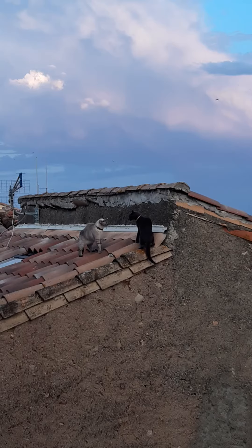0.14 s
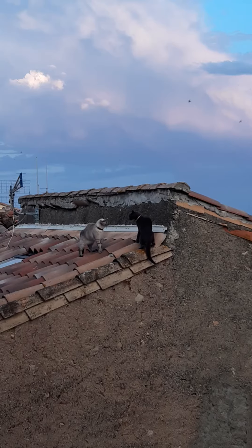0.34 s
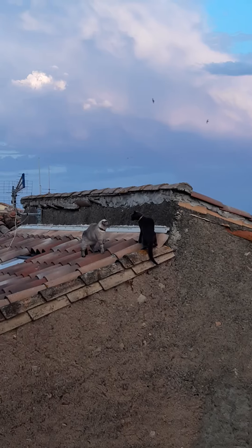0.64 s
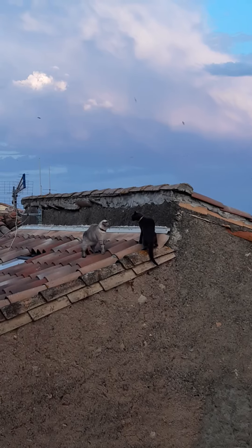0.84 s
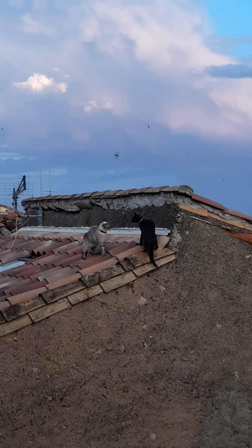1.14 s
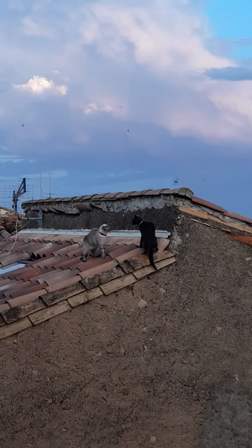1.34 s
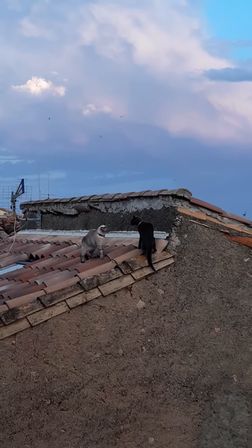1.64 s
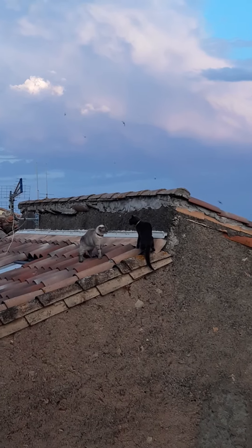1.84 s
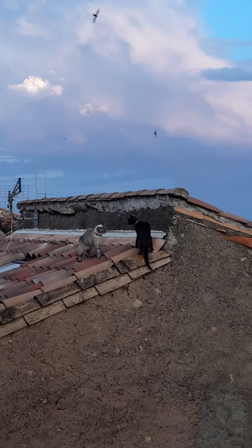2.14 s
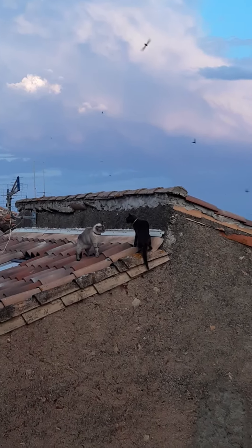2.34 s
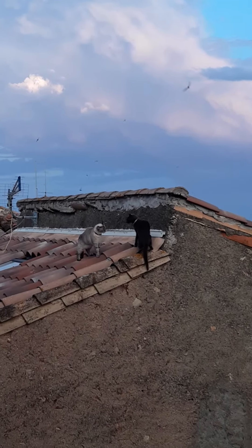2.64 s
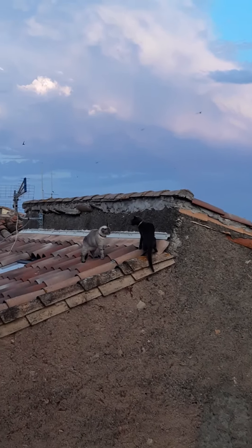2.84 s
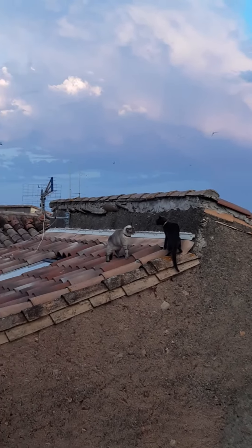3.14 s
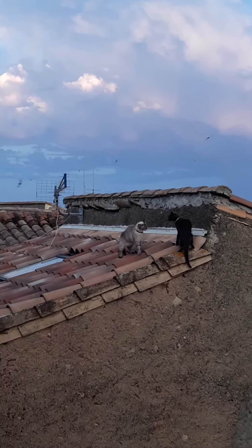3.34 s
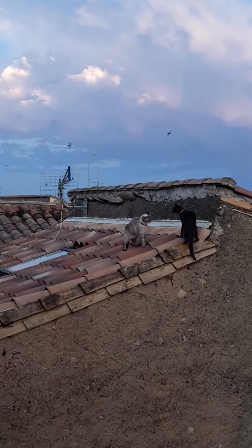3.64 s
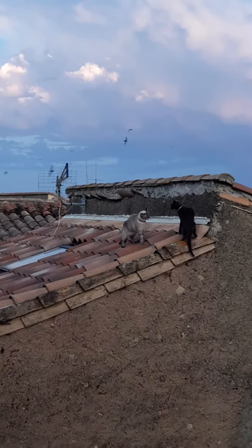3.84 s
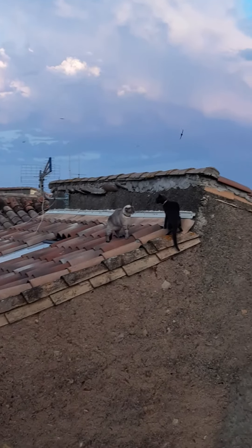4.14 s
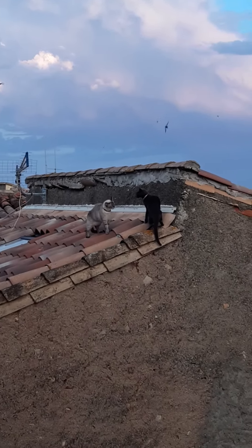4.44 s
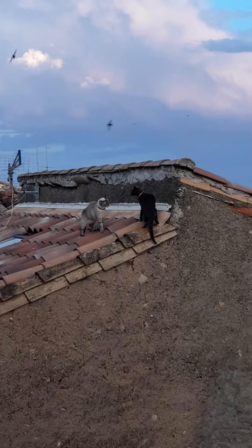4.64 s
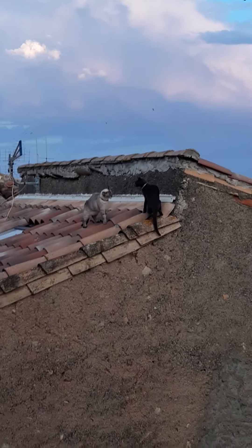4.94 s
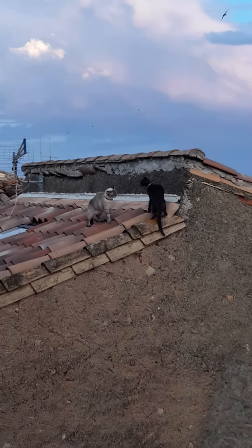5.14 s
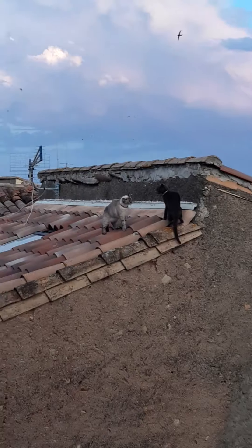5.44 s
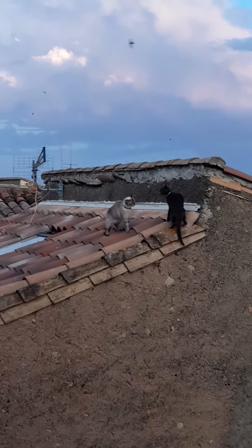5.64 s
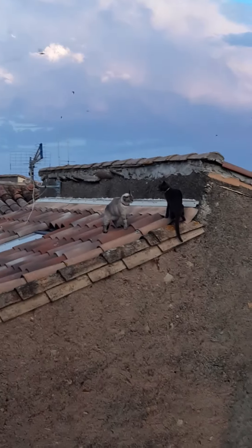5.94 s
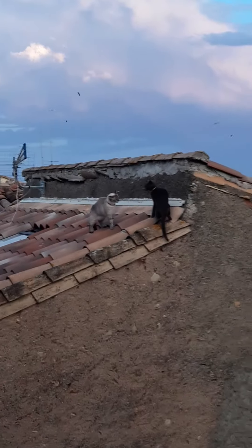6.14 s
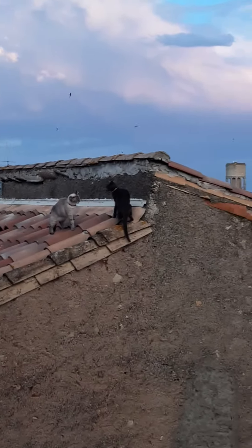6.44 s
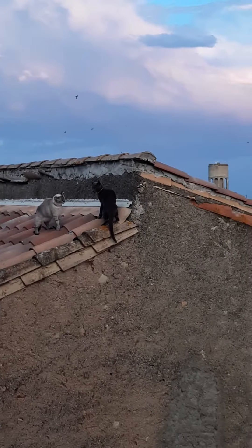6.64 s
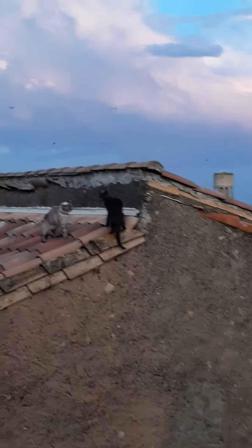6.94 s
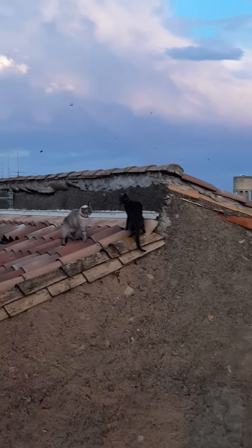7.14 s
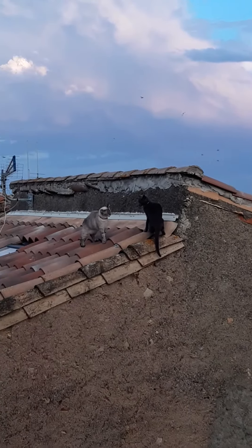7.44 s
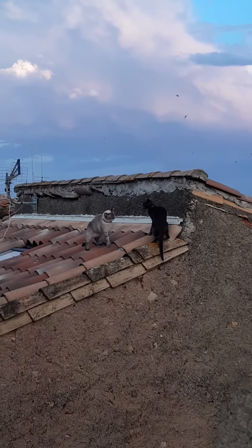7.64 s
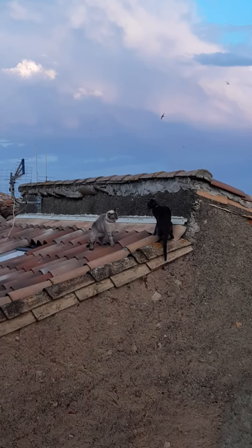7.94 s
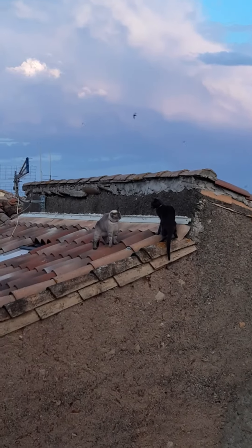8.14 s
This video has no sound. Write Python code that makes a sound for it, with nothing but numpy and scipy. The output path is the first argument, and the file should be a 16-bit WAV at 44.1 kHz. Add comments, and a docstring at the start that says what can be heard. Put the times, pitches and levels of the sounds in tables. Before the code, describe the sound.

Swifts scream overhead in shrill, buzzing, overlapping calls above rooftops, with a faint town hum and small handling clicks close by.

```python
"""At an open window over the roofs of a town, swifts scream past while the town hums faintly below.
Each swift's voice is a buzzing, hoarse whistle that leaps up and falls in a stutter; short chirps form trills.
Far birds add falling slurs and a blur of screams and noise; decaying noise makes the walls' echoes.
Close by on the right, bands of noise make a brushing sleeve, and snaps, knocks and thuds a handling hand."""
import sys
import numpy as np
from scipy import signal
from scipy.fft import rfft, irfft, next_fast_len
from scipy.io import wavfile

SR = 44100
rng = np.random.default_rng(int(sys.argv[2]) if len(sys.argv) > 2 else 0)


def digitize_waveform(pressure):
    """Quantize a signal to 16-bit integers and store it at the path in sys.argv[1].

    Rows of a 2-D input are taken as channels; values are limited to [-1, 1].
    """
    field = np.atleast_2d(pressure).T
    bounded = np.clip(field, -1, 1)
    quanta = np.round(bounded * 32767).astype(np.int16)
    wavfile.write(sys.argv[1], SR, quanta)


N = 365588
TIME = np.arange(N) / SR
RELEASE_DB_PER_S = 518   # how fast the sleeve lifts off


def from_db(db):
    """Turn decibels into a gain."""
    return 10 ** (np.asarray(db) / 20)


def rms_one(x):
    """Scale a signal to an average power of one."""
    return x / np.sqrt(np.mean(np.abs(x) ** 2) + 1e-20)


def curve(rows, s):
    """Read a curve at the given times, with straight lines between its points."""
    return np.interp(s, *np.transpose(rows))


def add(out, start_s, sound):
    """Mix a sound in at a time, cutting off what runs past the end."""
    at = max(0, int(start_s * SR))
    out[..., at:at + sound.shape[-1]] += sound[..., :max(0, N - at)]


def delayed(x, lag_s):
    """Shift a sound later, or earlier if the lag is negative; the lag may change as it goes."""
    n = np.arange(len(x))
    return np.interp(n - lag_s * SR, n, x)


def drift(size, rate_hz):
    """Make a smooth random wander around zero by blurring noise; a higher rate wanders faster."""
    r = np.exp(-2 * np.pi * rate_hz / SR)
    run_in = int(2 * SR / rate_hz)   # lets the filter settle first
    wander = signal.lfilter([1], [1, -2 * r, r * r], rng.standard_normal(size + run_in))
    return rms_one(wander)[-size:]


def fade(t, edge_s):
    """Give a sound a soft start and end."""
    to_nearest_end = np.minimum(t - t[0], t[-1] - t)
    return np.sin(np.pi / 2 * np.clip(to_nearest_end / edge_s, 0, 1)) ** 2


def panned(pan_db):
    """Give the left and right gains for a left-minus-right level."""
    return from_db(np.array([[.5], [-.5]]) * pan_db)


def noise(colour, alike, size=N):
    """Make stereo noise with a given spectrum; sides are equal when alike is 1, unrelated at 0."""
    padded = next_fast_len(size)
    hz, db = np.transpose(colour)
    octave = np.log2(np.maximum(np.fft.rfftfreq(padded, 1 / SR), 1))
    outside = np.abs(octave - np.clip(octave, np.log2(hz[0]), np.log2(hz[-1])))
    # beyond the ends of the table the level falls 20 dB per octave
    gain = from_db(np.interp(octave, np.log2(hz), db) - 20 * outside)
    mid, side = irfft(rfft(rng.standard_normal((2, padded))) * gain, padded)[:, :size]
    alike = np.clip(alike, -1, 1)
    return rms_one(np.sqrt(1 + alike) * mid + np.sqrt(1 - alike) * side * [[1], [-1]])


def lowpass(x, dull_hz):
    """Dull a sound by weakening what lies above a frequency."""
    return signal.sosfilt(signal.butter(2, min(dull_hz, .45 * SR), fs=SR, output="sos"), x)


def echoes(x, t60_s, delay_s, dull_hz, patchy_db):
    """Scatter a sound into many dulled reflections that fade by 60 dB in t60_s."""
    t = np.arange(0, t60_s, 1 / SR)
    strength = from_db(-60 * t / t60_s + patchy_db * drift(len(t), 67.1)) * (t > delay_s)
    tail = rng.standard_normal((2, len(t))) * strength
    tail = lowpass(rms_one(tail) / np.sqrt(len(t)), dull_hz)
    return signal.fftconvolve(x, tail, axes=1)[:, :N]


def town():
    """Distant traffic is a coloured noise; slightly wavering tones are a passing drone and faint toots."""
    # spectrum of the hum: (frequency [Hz], relative level [dB per Hz])
    hum_colour = [(25, -18.5), (60, -7), (100, -6), (140, 1.5), (220, -11), (300, -14), (400, -11.5),
                  (600, -21.5), (1200, -23.5), (2500, -27), (8000, -34), (15000, -27.5)]
    # a low drone, then horn-like toots: (start [s], end [s], pitch [Hz], level [dB])
    far_tones = [(0, 1.02, 140, -72), (.44, 0.636, 1140, -84.5), (4.038, 4.238, 1150, -79.5),
                 (4.53, 4.698, 780, -86), (6.067, 6.302, 970, -73), (8.106, 8.33, 701, -74.5)]
    hum_db = -68.5
    out = noise(hum_colour, alike=0.56) * from_db(hum_db) * panned(-0.75)
    for start, end, hz, db in far_tones:
        t = np.arange(start, end, 1 / SR)
        phase = 2 * np.pi * np.cumsum(hz * (1 + 0.012 * drift(len(t), 60))) / SR
        add(out, start, np.sqrt(2) * np.sin(phase) * from_db(db) * fade(t, 0.013))
    return out


def pressure(t, full, release, swell_db_per_s):
    """A stroke swells to full pressure, holds and lifts off quickly."""
    swell_db = -swell_db_per_s * np.maximum(full - t, 0)
    release_db = -RELEASE_DB_PER_S * np.maximum(t - release, 0)
    return from_db(swell_db + release_db) * fade(t, 0.013)


def snags(size, per_s=170, spread_db=4.0, t60_s=0.011):
    """Threads catch and let go at random: a train of small dying surges, scaled to unit power."""
    strength = from_db(spread_db * np.minimum(rng.exponential(1, size), 2.5))
    slips = (rng.random(size) < per_s / SR) * strength
    return rms_one(signal.lfilter([1], [1, -from_db(-60 / (t60_s * SR))], slips))


def sleeve(grain_db=0.3, snag_share=0.29, grit_per_s=420):
    """Cloth catches and slips close to the right microphone port: noise shaped by pressure and snags."""
    # soft hollow shuffles: (start [s], full pressure [s], release [s], level [dB])
    shuffle_rows = [(5.545, 5.767, 5.87, -61.5), (7.901, 8.09, 8.29, -64)]
    # spectrum of the shuffles: (frequency [Hz], relative level [dB per Hz])
    shuffle_colour = [(250, -5.5), (480, 1), (680, 2), (1000, -4.5), (1400, 8.5), (1800, -12), (3000, -8)]
    # strokes of the sleeve, levels at full pressure before panning:
    # (start [s], full pressure [s], release [s], rub [dB], hiss [dB], grit [dB])
    stroke_rows = [(5.16, 5.276, 5.28, -53.5, -55.5, -47), (5.949, 6.004, 6.03, -53.5, -59, -50),
                   (6.02, 6.03, 6.046, -47, -62, -46.5), (6.522, 6.631, 6.68, -51, -60.5, -72),
                   (6.676, 6.736, 6.858, -43.5, -50.5, -55.5)]
    # spectrum of rubbing cloth: (frequency [Hz], relative level [dB per Hz])
    rub_colour = [(500, -37), (900, -13.5), (1500, -3.5), (1950, 5), (2600, -1), (3300, -5.5), (3900, -2),
                  (5500, -5.5), (7500, -20), (10000, -12)]
    # spectrum of hissing fibres: (frequency [Hz], relative level [dB per Hz])
    hiss_colour = [(4000, 1), (7000, 18.2), (8700, 1.6), (10000, 3), (12500, 5.5), (14300, 8.8), (16000, 6)]
    # spectrum of crackling coarse threads: (frequency [Hz], relative level [dB per Hz])
    grit_colour = [(2300, -28), (3000, 4), (3800, 4.5), (4600, 0), (6500, -9)]
    shuffle_swell, rub_swell, hiss_swell = 47, 190, 90   # dB per second
    out = np.zeros((2, N))
    tail_s = 60 / RELEASE_DB_PER_S
    for start, full, release, db in shuffle_rows:
        t = np.arange(start, release + tail_s, 1 / SR)
        level = from_db(db + 0.28 * drift(len(t), 38))
        hollow = noise(shuffle_colour, alike=0.1, size=len(t)) * level
        add(out, start, hollow * pressure(t, full, release, shuffle_swell) * panned(-4.5))
    for start, full, release, rub_db, hiss_db, grit_db in stroke_rows:
        t = np.arange(start, release + tail_s, 1 / SR)
        size = len(t)
        grip = rms_one(1 - snag_share + snag_share * snags(size))
        rub_level = from_db(rub_db + grain_db * drift(size, 46.0))
        rub = noise(rub_colour, alike=0.72, size=size) * rub_level * grip
        fibres = noise(hiss_colour, alike=0.084, size=size) * from_db(hiss_db) * np.sqrt(np.abs(grip))
        crackle = snags(size, per_s=grit_per_s, t60_s=0.0093)
        grit = noise(grit_colour, alike=0.4, size=size) * from_db(grit_db) * crackle
        add(out, start, (rub + grit) * pressure(t, full, release, rub_swell) * panned(-6.5))
        add(out, start, fibres * pressure(t, full, release, hiss_swell) * panned(-18.0))
    return out


def clicks():
    """A tick is a bright snap over a dry knock, with room echoes; a bump is a knock with a low thud."""
    # bright ticks, levels before filtering and panning:
    # (time [s], snap [dB], knock [dB], dull above [Hz], snap's time to fall 60 dB [s])
    tick_rows = [(3.1184, -26.5, -45, 6750, 0.039), (3.121, -38, -45.5, 6760, 0.029),
                 (4.347, -46, -48, 5000, 0.026), (5.162, -35.5, -53, 14700, 0.1),
                 (5.2723, -47, -51, 5000, 0.0095), (5.283, -44, -43, 5050, 0.022),
                 (6.0405, -29.5, -29, 5500, 0.0046), (6.05, -30, -45, 6000, 0.014),
                 (6.132, -40, -51, 16900, 0.076), (6.2591, -26, -42, 17500, 0.049),
                 (6.6078, -31, -48, 17000, 0.042)]
    # dull bumps felt through the casing, before panning: (time [s], knock [dB], thud [dB])
    bump_rows = [(5.162, -51, -57), (5.953, -50.5, -57), (8.0542, -37, -46), (8.0945, -43, -55),
                 (8.0993, -39, -51)]
    # spectrum of a snap: (frequency [Hz], relative level [dB per Hz])
    snap_colour = [(2000, -20), (4300, -1), (5500, -3.5), (7200, 6.5), (9000, -2.5), (12000, 2.5),
                   (15000, 7)]
    knock_low_hz, knock_top_hz = 840, 2370
    thud_hz, thud_t60_s = 123, 0.028
    ticks, bumps = np.zeros((2, N)), np.zeros((2, N))
    t = np.arange(SR // 10) / SR
    casing = signal.butter(2, [knock_low_hz, knock_top_hz], "band", fs=SR, output="sos")
    # one single pulse, filtered twice, is the knock
    knock = signal.sosfilt(casing, signal.sosfilt(casing, 1.0 * (t == 0)))
    knock = knock / np.abs(knock).max()
    thud = np.sin(2 * np.pi * thud_hz * t) * from_db(-60 * t / thud_t60_s)
    for s, snap_db, knock_db, dull_hz, snap_t60_s in tick_rows:
        snap = noise(snap_colour, alike=0.4, size=len(t)) * from_db(snap_db - 60 * t / snap_t60_s)
        snap = lowpass(snap, dull_hz)
        add(ticks, s, snap * panned(-8.0) + knock * from_db(knock_db) * panned(5.0))
    for s, knock_db, thud_db in bump_rows:
        add(bumps, s, (knock * from_db(knock_db) + thud * from_db(thud_db)) * panned(-17.5))
    room = echoes(ticks, t60_s=0.19, delay_s=0.0027, dull_hz=14700, patchy_db=1.5)
    return ticks + bumps + from_db(-8.5) * room


def whistle(hz, octave_db, buzz, rasp, buzz_hz=250, buzz_depth=1.55, waver=0.013, rasp_hz=700,
            half_db=-8, skirt=1.0, skirt_hz=2200, beak_hz=7250, beak=0.82):
    """A swift's voice: a high tone, shaken by a fast buzz and frayed by turbulence."""
    size = len(hz)
    shake_hz = buzz_hz * np.exp(0.135 * drift(size, 24.66))
    shake = np.sin(2 * np.pi * np.cumsum(shake_hz) / SR)
    shaken_hz = hz * (1 + waver * drift(size, 300) + 0.16 * buzz * shake)
    phase = 2 * np.pi * np.cumsum(shaken_hz) / SR
    fray = rasp * (drift(size, rasp_hz) + 1j * drift(size, rasp_hz))
    # a hard-driven syrinx (voice organ) doubles its period: weak lines at half-steps of the pitch
    halves = np.exp(3j * phase / 2) + .5 * np.exp(5j * phase / 2) + 0.082 * np.exp(1j * phase / 2)
    halves = from_db(half_db + 1.75 * octave_db) * halves
    octave = from_db(octave_db) * np.exp(2j * phase) * (1.0 + 8.0 * fray)
    tones = (np.exp(1j * phase) + halves) * (1 + fray) + octave
    voice = np.real(rms_one(1 + np.minimum(buzz_depth * buzz, 1) * shake) * tones)
    # hoarse air pulses with the buzz and rings broadly in the throat
    throat = signal.butter(3, [3600, 7600], "band", fs=SR, output="sos")
    air = signal.sosfilt(throat, np.cos(phase) * drift(size, skirt_hz) * (1 + shake))
    # and more narrowly in the open beak
    open_beak = signal.butter(2, [.94 * beak_hz, 1.06 * beak_hz], "band", fs=SR, output="sos")
    ring = signal.sosfilt(open_beak, rng.standard_normal(size))
    return np.sqrt(2) * (voice + rasp * (skirt * air + beak * rms_one(ring)))


def in_flight(voice, flutter_db, own_db, scatter_s=.000025, sweep=.0001, roof_s=.009, roof_db=-9):
    """Wingbeats flutter the level, a roof reflection beats with the direct sound, the bearing sweeps."""
    voice = np.pad(voice, (0, SR // 25))   # room for the reflection to end
    size = len(voice)
    t = np.arange(size) / SR
    bounce_s = roof_s * (.5 + rng.random() + 0.294 * rng.normal() * t)
    voice = voice + from_db(roof_db) * delayed(voice, bounce_s)
    side_lag_s = scatter_s * rng.normal() + sweep * rng.normal() * (t - t.mean())
    ports = np.array([voice, delayed(voice, side_lag_s)])
    each_side = own_db * np.array([drift(size, 43.5), drift(size, 12.32)])
    return ports * from_db(flutter_db * drift(size, 23.04) + each_side)


def scream(start, end, pitch_hz, leap, rise_s, drop, db, swell_db, octave_db, harsh, stutter_hz=60):
    """The pitch leaps up, creeps to a crest and falls; the voice throbs, grows harsher and stutters."""
    creep = .03   # share of the pitch
    fall_share, fall_per_drop = .17, .65   # share of the call spent falling; deeper falls take longer
    onset_db = 9.5   # the voice is weaker until the leap is done
    throb_hz, throb_db = 28.9, 2   # average rate and depth of brief dips in level
    t = np.arange(max(start, 0), end, 1 / SR)
    fall_s = (end - start) * np.clip(fall_share + fall_per_drop * drop, .05, .8)
    climb = np.clip((t - start) / (end - fall_s - start), 0, 1)
    fall = np.clip(1 - (end - t) / fall_s, 0, 1)
    early = np.exp((start - t) / max(rise_s, .004))
    hz = pitch_hz * (1 - leap * early + creep * climb ** 2.4 - drop * fall ** 1.4)
    beat = 2 * np.pi * np.cumsum(stutter_hz * np.exp(0.1543 * drift(len(t), 19.8))) / SR
    throb_rate_hz = throb_hz * np.exp(.2 * drift(len(t), 12))
    catch = np.cos(np.pi * np.cumsum(throb_rate_hz) / SR) ** 6
    depth = np.clip(1.9 * fall, 0, 1)   # the stutter deepens on the way down
    hz = hz * (1 - 0.051 * depth * np.sin(beat))   # each pulse slides downward
    buzz = harsh * (0.2 + 0.095 * climb)
    rasp = harsh * (0.026 + 0.082 * climb + 0.088 * fall)
    voice = whistle(hz, octave_db - 4 * (1 - climb), buzz=buzz, rasp=rasp, waver=.008 * harsh)
    arch_db = db + swell_db * (climb - .5) - onset_db * early - 3 * fall
    throbbing_db = -throb_db * (catch - catch.mean())
    stutter_db = 4.1 * depth * (np.cos(beat) - .55)
    level = from_db(arch_db + throbbing_db + stutter_db)
    return in_flight(voice * level * fade(t, 0.0074), flutter_db=1.63, own_db=1.71)


def far_flock(count=60, calls_db=1.0, wash_db=-4.5, spread_db=6):
    """The rest of the flock, blurred by distance: random short screams, echoes and a wash of noise."""
    # level curve for calls and wash together, before their own gains: (time [s], level [dB])
    flock_level = [(0.0, -57), (0.92, -58.5), (1.04, -67.5), (1.85, -64), (2.35, -67), (2.84, -58),
                   (3.39, -61.5), (3.9, -57.5), (4.32, -59), (4.69, -57), (5.36, -64.5), (5.75, -55),
                   (6.5, -58.5), (6.95, -59), (7.5, -63), (8.29, -58)]
    # spectrum of the wash: (frequency [Hz], relative level [dB per Hz])
    wash_colour = [(2500, -21), (3300, -7), (4000, 5), (5300, 7), (6200, -0.5), (7000, 2), (8200, -41)]
    out = np.zeros((2, N))
    for k, (when, pitch, length, drop, far) in enumerate(rng.random((count, 5))):
        call = scream(0, .08 + .2 * length, 5200 + 1100 * pitch, leap=.12, rise_s=.035, drop=.35 * drop,
                      db=-spread_db * far, swell_db=0, octave_db=-32, harsh=.8)
        add(out, (k + 2 * when - 1) / count * N / SR, call)
    reflected = echoes(out, t60_s=0.5, delay_s=0.015, dull_hz=6860, patchy_db=6.5)
    calls = rms_one(out + 2.7 * reflected)
    wash = noise(wash_colour, alike=0.098) * from_db(4.7 * drift(N, 11.6))
    return (from_db(calls_db) * calls + from_db(wash_db) * wash) * from_db(curve(flock_level, TIME))


def slurs(direct_db=-2, echo_db=-13, rattle_hz=48, rattle_db=5):
    """Hoarse falling notes rattle as their level pulses, with a short echo."""
    # slurs, mostly of far birds; levels before the fade, rattle and direct or echo gain:
    # (start [s], length [s], first pitch [Hz], last pitch [Hz], level [dB])
    slur_rows = [(0.129, 0.089, 3510, 2690, -67.5), (1.237, 0.072, 4190, 3800, -59),
                 (1.486, 0.092, 4400, 3160, -70.5), (2.08, 0.069, 3730, 2580, -69),
                 (2.235, 0.12, 4430, 2690, -69), (3.35, 0.093, 3640, 2500, -70.5),
                 (3.686, 0.091, 3820, 2710, -71.5), (4.39, 0.068, 3650, 2590, -64.5),
                 (4.641, 0.059, 3870, 2800, -57), (6.322, 0.073, 4020, 3030, -60.5),
                 (6.349, 0.1, 5700, 4560, -73), (7.136, 0.14, 5360, 4020, -56.5),
                 (7.545, 0.042, 5160, 4080, -53.5), (7.729, 0.051, 3700, 3330, -60.5),
                 (7.8, 0.13, 5700, 4270, -43.5)]
    out = np.zeros((2, N))
    for start, length, first_hz, last_hz, db in slur_rows:
        t = np.arange(0, length, 1 / SR)
        hz = first_hz + (last_hz - first_hz) * t / length
        voice = whistle(hz, octave_db=-33, buzz=0.39, rasp=0.076, waver=0.034)
        level_db = db - 7.7 * (t / length) ** 2 + rattle_db * np.cos(2 * np.pi * rattle_hz * t)
        note = voice * from_db(level_db) * fade(t, 0.0043)
        add(out, start, in_flight(note, flutter_db=2.0, own_db=4.5))
    reflected = echoes(out, t60_s=0.2, delay_s=0.0047, dull_hz=6000, patchy_db=5.0)
    return from_db(direct_db) * out + from_db(echo_db) * reflected


def trills(length_s=.011, fall=0.062, octave_gain_db=-2):
    """A trill is a run of separate notes, each a short, hoarse downward chirp."""
    # notes of the trills that end screams; octave is relative to the note, before octave_gain_db:
    # (middle [s], middle pitch [Hz], level before flight effects [dB], octave [dB])
    note_rows = [(0.296, 5920, -45, -21), (0.325, 5080, -49, -30), (.78, 5700, -43, -0.5),
                 (0.801, 5960, -45, 0), (0.824, 5840, -37.5, -3), (.848, 5770, -37.5, -7),
                 (0.872, 5550, -39, -9), (1.589, 5310, -49, -26), (1.621, 5180, -44, -31),
                 (1.651, 5140, -47.5, -33), (1.677, 5690, -46.5, -39), (2.866, 4800, -45, -14),
                 (2.892, 5200, -41, -6), (2.919, 4510, -46, -12), (2.948, 4480, -44, -8),
                 (2.979, 4050, -47.5, -1), (3.007, 4520, -53, -20), (3.477, 5520, -46, -9),
                 (3.497, 5430, -43.5, -7), (3.521, 5517, -46.5, -6), (3.549, 5210, -36, -13),
                 (3.577, 4920, -43, -26), (3.598, 4350, -54, -26), (3.806, 5600, -37, -14),
                 (3.833, 5700, -35, -8), (3.864, 4660, -37, -19.5), (3.893, 4580, -39.5, -27),
                 (3.916, 4080, -45, -15), (4.433, 5370, -35.5, -17), (4.454, 5420, -40, -11),
                 (4.465, 5520, -41.5, -4.5), (4.502, 5390, -37, -17), (4.514, 5260, -39.5, -16),
                 (4.528, 4970, -36.5, -30), (4.542, 4590, -48, -29), (5.166, 5740, -35, -17),
                 (5.193, 5500, -36, -9), (5.22, 5280, -32, -21), (5.257, 4980, -35.5, -20),
                 (7.809, 5560, -38, -16), (7.831, 5360, -36, -16), (7.861, 5150, -35.5, -27),
                 (7.882, 5100, -42, -25), (7.902, 4860, -44.5, -30), (7.925, 4430, -46, -20)]
    out = np.zeros((2, N))
    t = np.arange(0, length_s, 1 / SR)
    for middle, hz, db, octave_db in note_rows:
        falling_hz = hz * (1 + fall * (.5 - t / length_s))
        voice = whistle(falling_hz, octave_db + octave_gain_db, buzz=0.18, rasp=0.023)
        note = voice * from_db(db) * fade(t, 0.0047)
        flying = in_flight(note, flutter_db=-1.1, own_db=1.0, scatter_s=.000012, roof_db=-7.0)
        add(out, middle - length_s / 2, flying)
    return out


def screams():
    """The birds that race past the house, each with its own arching call."""
    # base settings of each scream, which its arch, throb and stutter then vary:
    # (start [s], end [s], pitch [Hz], depth below it at the start [share], leap time constant [s],
    #  pitch lost at the end [share], level [dB], swell from start to crest [dB],
    #  octave relative to the main tone at the crest [dB], harshness [no unit])
    scream_rows = [(-.1, 0.351, 5756, .15, 0.037, 0.093, -47, -4.5, -17, 0.72),
                   (0.302, 0.476, 5950, 0.052, 0.047, .03, -51, -12, -38, .5),
                   (0.444, 0.78, 5960, 0.23, 0.039, 0.044, -44, -8, -3.5, 0.49),
                   (.69, 0.999, 5655, .22, 0.067, 0.23, -45, -2, -23, 0.64),
                   (1.032, 1.306, 5380, .13, 0.047, 0.065, -57.5, -9, -32, 0.61),
                   (1.076, 1.27, 4820, 0.0089, 0.019, .06, -64, 4, -26, 0.76),
                   (1.287, 1.388, 6120, 0.23, 0.034, 0.04, -50, -2, -28, 0.54),
                   (1.374, 1.703, 5264, 0.0027, 0.006, 0.041, -50, -12.5, -23, 0.83),
                   (1.816, 2.296, 5856, .29, .05, 0.12, -58.5, -13.5, -22, 0.39),
                   (2.407, 2.666, 5360, 0.18, 0.064, .02, -56.5, -14, -25, 0.32),
                   (2.555, 2.864, 4917, 0.095, 0.048, 0.051, -48.5, -6.5, -27, 0.87),
                   (2.573, 2.994, 5516, 0.13, 0.04, .23, -47.5, -1, -15, 1.0),
                   (3, 3.301, 6110, .05, .05, 0.011, -59.5, -9, -31, 0.62),
                   (3.157, 3.48, 5700, 0.17, 0.032, 0.057, -51, -11, -15, 0.9),
                   (3.59, 3.805, 5800, .25, .04, 0.021, -41, -7, -19, 0.65),
                   (3.891, 4.155, 5644, 0.2, .036, 0.097, -48, -12, -30, 0.71),
                   (4.155, 4.377, 4930, 0.099, 0.016, 0.0094, -38, 5, -26, 0.46),
                   (4.36, 4.506, 5510, .08, 0.06, 0.032, -40.5, -11.5, -14.5, 0.75),
                   (4.597, 4.797, 5660, .12, 0.033, 0.033, -53.5, -18, -26, 0.89),
                   (4.617, 4.797, 6850, 0.19, 0.065, 0.026, -61.5, -9, -30, 0.59),
                   (4.835, 5.254, 5897, .29, .014, 0.2, -35, -6.5, -16.5, 0.77),
                   (4.919, 5.144, 5490, 0.22, 0.055, 0.06, -48.5, -2, -32, 1.1),
                   (5.305, 5.468, 5830, 0.17, .04, 0.015, -59, -5, -41, 0.24),
                   (5.39, 5.608, 6400, .23, 0.075, 0.03, -54.5, -6, -34, 0.47),
                   (5.509, 5.811, 5790, .14, 0.026, 0.066, -57.5, -7, -23.5, 0.56),
                   (5.632, 5.803, 5120, .14, .03, .1, -63, 0, -33, 1.1),
                   (5.742, 5.947, 5570, .12, 0.05, 0.059, -50, -7, -26, 0.73),
                   (6.01, 6.292, 5920, 0.19, .035, 0.019, -50, -17, -16, 0.69),
                   (6.068, 6.264, 5470, 0.11, 0.048, 0.017, -54, -2, -18, 0.69),
                   (6.523, 6.901, 6300, 0.14, 0.066, 0.073, -49.5, 0, -20, 0.62),
                   (6.867, 7.105, 5860, .03, 0.033, .06, -60.5, -1, -22, 0.82),
                   (7.119, 7.514, 6464, .11, .06, 0.13, -41.5, 2, -23.5, 0.77),
                   (7.497, 7.772, 6100, .18, 0.036, 0.035, -35, -7, -13.5, 0.71),
                   (7.567, 7.774, 6720, 0.13, 0.04, 0.077, -38, -0.5, -40, 0.48),
                   (7.755, 8, 6310, 0.12, 0.03, 0.018, -38, -4, -16, 0.37),
                   (7.982, 8.341, 6400, 0.21, .055, 0.015, -38.5, -4, -14.5, 0.75),
                   (8.036, 8.38, 6077, .17, .028, 0.052, -36.5, -10, -20, 0.86)]
    out = np.zeros((2, N))
    for row in scream_rows:
        add(out, row[0], scream(*row))
    return out


def swifts():
    """All birds, the near ones echoed by house walls, shift between the sides by level and arrival time."""
    # where the flock is: (time [s], left minus right level [dB])
    bearing = [(0, 1.5), (2.8, -2.5), (3.6, -3), (5.5, -2), (7.3, -6.5), (8.29, -3.5)]
    port_lag_s_per_db = .00001   # sound from the right reaches the left port later
    birds = screams() + trills() + slurs()
    street = from_db(-9) * echoes(birds, t60_s=0.55, delay_s=0.018, dull_hz=8500, patchy_db=4)
    pan_db = curve(bearing, TIME)
    left, right = (birds + street + far_flock()) * panned(pan_db)
    return np.array([delayed(left, -port_lag_s_per_db * pan_db), right])


def scene():
    """Birds above, town below, the hand close by on the right."""
    hand_lag_s = .00045   # the hand's sounds reach the left port later
    left, right = sleeve() + clicks()
    return swifts() + town() + np.array([delayed(left, hand_lag_s), right])


def record(dry):
    """The recorder cuts the top of the treble with a steep filter."""
    cutoff_hz = 15850
    return signal.sosfilt(signal.ellip(10, .1, 70, cutoff_hz, fs=SR, output="sos"), dry)


dry = scene()
out = record(dry)
digitize_waveform(out)
```